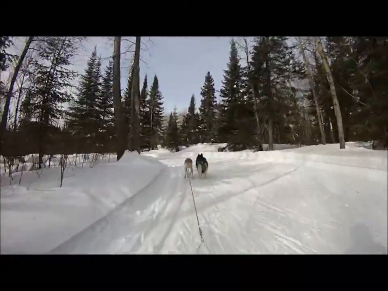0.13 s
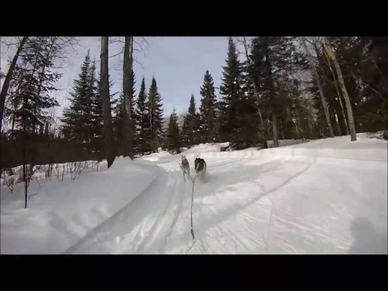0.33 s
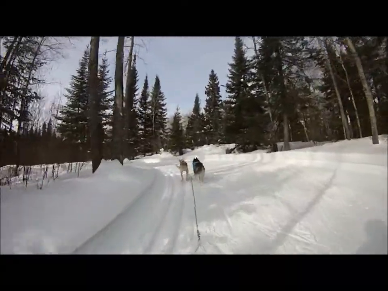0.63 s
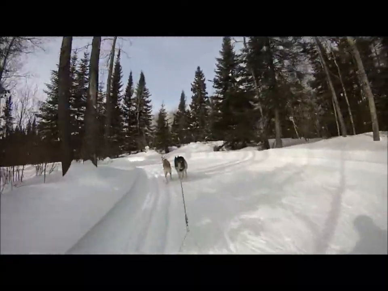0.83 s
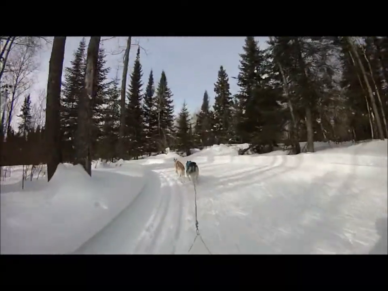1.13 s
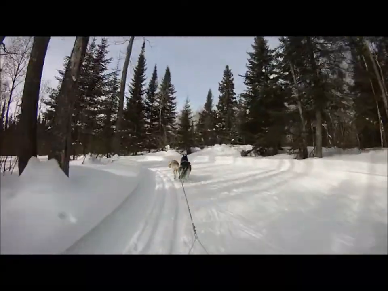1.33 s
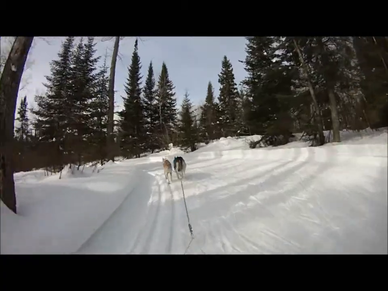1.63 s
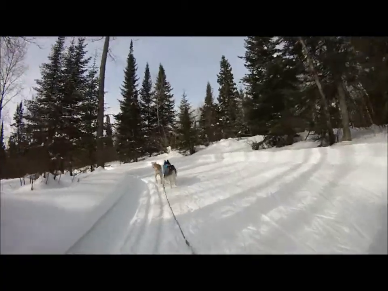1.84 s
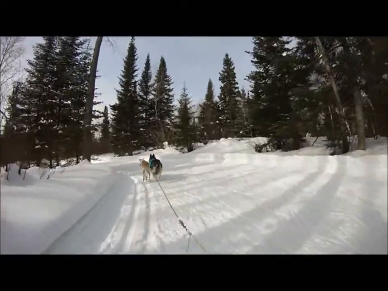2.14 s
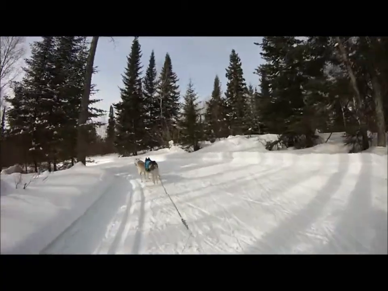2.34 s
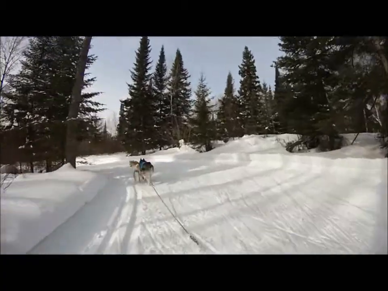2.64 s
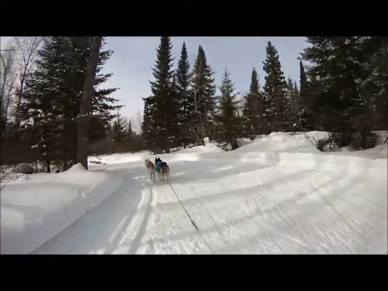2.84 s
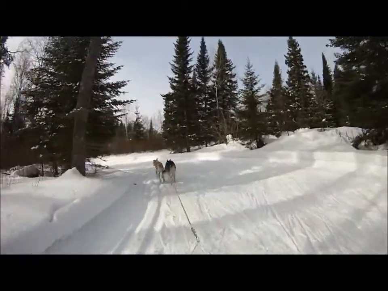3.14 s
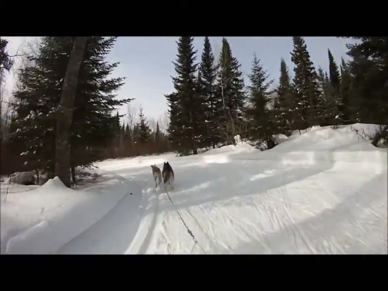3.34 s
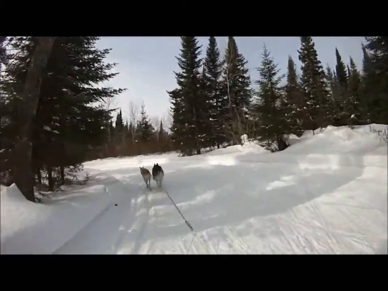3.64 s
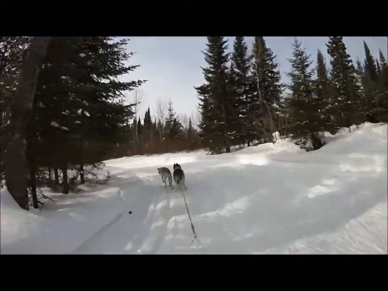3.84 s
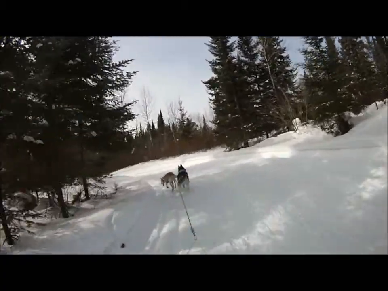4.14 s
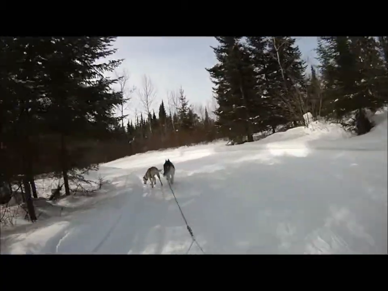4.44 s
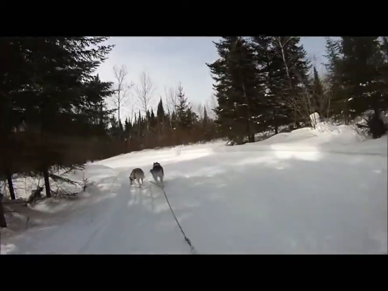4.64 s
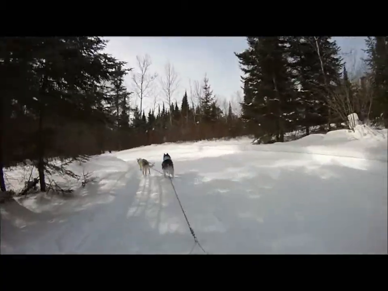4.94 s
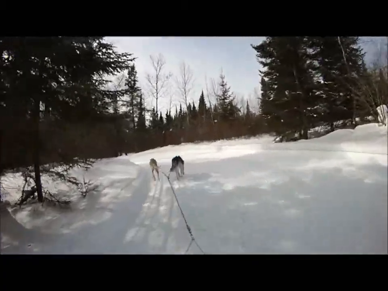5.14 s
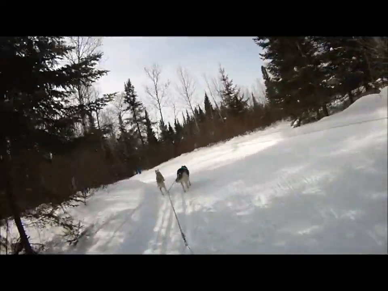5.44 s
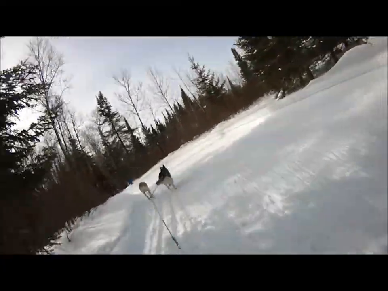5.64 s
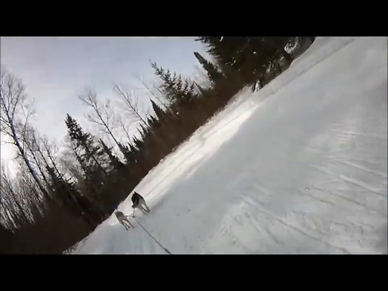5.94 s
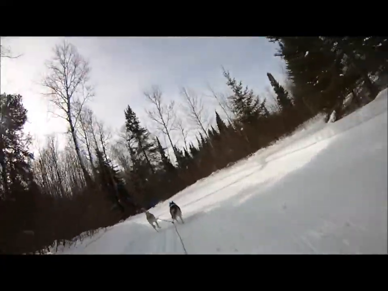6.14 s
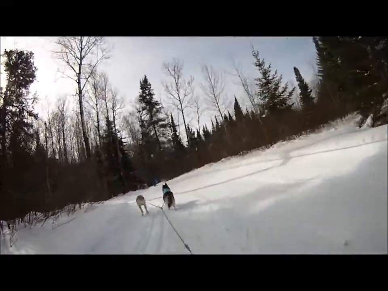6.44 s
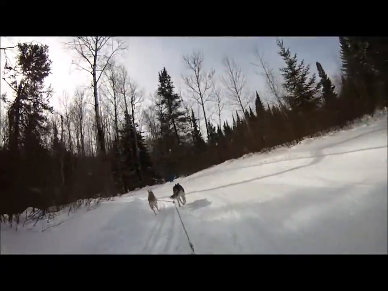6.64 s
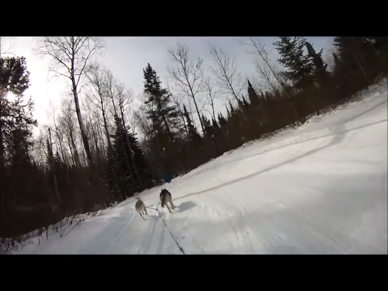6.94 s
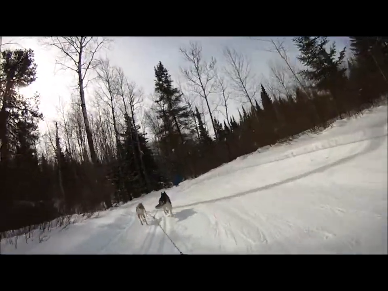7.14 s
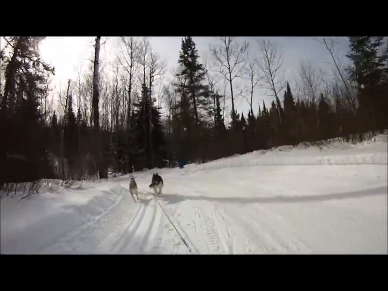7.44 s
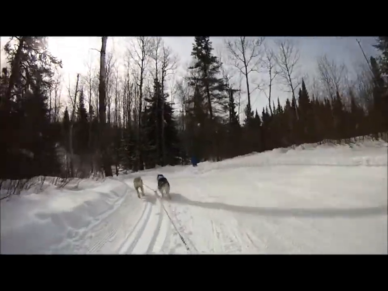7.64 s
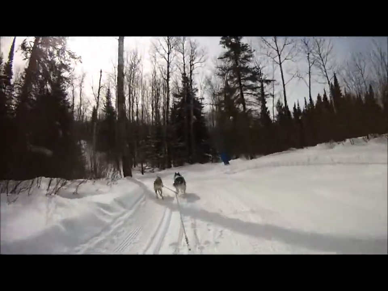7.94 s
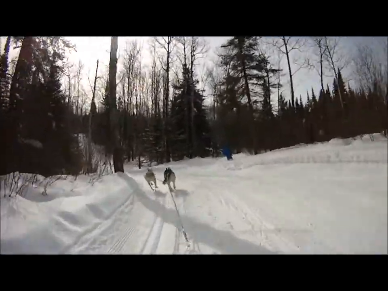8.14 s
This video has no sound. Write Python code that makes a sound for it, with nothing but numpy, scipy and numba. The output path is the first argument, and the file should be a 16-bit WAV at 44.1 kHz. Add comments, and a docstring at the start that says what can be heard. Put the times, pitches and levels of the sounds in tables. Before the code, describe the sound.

Outdoors on a snowy forest trail, a dog sled's runners scrape with a flickering, grainy hiss. The quiet opening gives way to clusters of plastic ticks, low thumps and wind buffets around one and a half seconds. Sharper clicks follow at three, then the hardest knocks near five. After a quieter, ticking stretch, bumps return at the end. The close onboard microphone sounds boxed-in and mono, ducking after loud hits.

```python
"""Sled runners hiss along a packed forest trail: grainy noise rung through a plastic housing's modes.
The mount ticks, creaks and rattles by stick and slip: each slip strikes the same modes and adds a snap.
Wind buffets the microphone as gusty bands of low noise; jolts thump it as brief low swings.
Gain control ducks the loud bursts and creeps back; one microphone feeds both channels."""
import sys
import numpy as np
from scipy import signal
from scipy.io import wavfile
from scipy.ndimage import uniform_filter1d
from numba import njit

SR = 44100
rng = np.random.default_rng(int(sys.argv[2]) if len(sys.argv) > 2 else 0)


def output_pcm(signal):
    """Save a mono or channel-first signal as 16-bit PCM at the path in sys.argv[1].

    Samples are clipped to [-1, 1] before scaling.
    """
    pcm = np.clip(np.atleast_2d(signal).T, -1, 1) * 32767
    wavfile.write(sys.argv[1], SR, np.round(pcm).astype(np.int16))


def volts_from_db(level):
    """Convert decibel levels to linear amplitude ratios."""
    exponent = np.asarray(level, float) / 20
    return 10 ** exponent


N = 365126

# All levels are those of the layers, ahead of the gain control.
# runner hiss through the glide: t/s, level/dB
HISS_LEVEL = [(0.0, -36), (0.12, -46.5), (0.46, -49.5), (1.47, -39.5), (1.68, -46.5), (2.17, -31),
              (2.33, -39.5), (2.85, -30.5), (3.23, -42), (4.17, -39.5), (4.56, -41), (4.98, -30),
              (5.5, -44), (6.0, -37.5), (6.2, -49), (7.2, -45), (7.55, -31), (7.8, -41), (8.28, -34.5)]
# wind and shaking on the microphone: t/s, level/dB
GUST_LEVEL = [(0.0, -51.5), (0.23, -34.5), (0.32, -52), (0.8, -47.5), (1.45, -41), (1.63, -27.5),
              (1.87, -42), (2.2, -43), (2.44, -29.5), (2.72, -48), (2.97, -29), (3.14, -40.5),
              (3.33, -25.5), (3.42, -41), (3.83, -44), (3.94, -29), (4.33, -29.5), (4.4, -43), (4.66, -34),
              (4.89, -39.5), (5.14, -30), (5.23, -43.5), (5.4, -34), (5.78, -46), (6.1, -34), (6.2, -51.5),
              (7.4, -40), (7.63, -30), (7.82, -32.5), (7.89, -46), (7.95, -35.5), (8.28, -34.5)]
# resonant modes of the housing: f/Hz, width/Hz, level/dB
HOUSING_MODES = [(735, 790, -12.5), (1046, 372, -3), (1449, 180, -6.5), (1604, 51, -3), (2037, 167.5, 1),
                 (2284, 239, -2.5), (3184, 250, -17.5), (3638, 220, -15), (4627, 240, -6.5),
                 (5172, 230, -9), (6256, 390, -22.5), (7040, 260, -15.5), (8210, 287, -17),
                 (9810, 116, -37.5), (10530, 430, -50), (12700, 460, -46), (13600, 740, -50)]
# broad resonances of a slip's snap: f/Hz, width/Hz, level/dB
SNAP_BANDS = [(1560, 530, -16), (6860, 3100, -12)]
# eddy sizes in the wind, as bands of rumble: f/Hz, level/dB
EDDY_BANDS = [(65, -16.5), (120, -9.5), (200, -0.5), (310, 2.5), (460, -8.5), (700, -38)]
# single slips of the mount: t/s, relative level/dB, then against it: body/dB, treble/dB
TICK_SLIPS = [(0.1213, -15.5, -10, 1.5), (0.4705, -18, -11, -14), (0.7405, -19, -10, 1.5),
              (0.8186, -13.5, -10, -7), (0.8383, -15.5, -11, -7), (0.8766, -13, -11, -11),
              (0.936, -22, -11, -30), (1.3474, -20, -1.5, -6.5), (1.5871, -13, -7, -5),
              (1.642, -9.5, -10, -8.5), (1.6513, -11, -7.5, -10), (1.6224, -22, -4, -9),
              (1.6941, -9.5, -14, -8.5), (1.7005, -22, -11, -14), (1.9017, -14.5, -9.5, -29),
              (1.915, -18.5, -4.5, -28), (1.931, -17.5, -5, -21), (2.4069, -8, -15, -19.5),
              (2.8397, -9.5, 0, -15), (2.8987, -12, -9, -20), (2.9798, -11, -13, -24),
              (3.0027, -1.5, -6, -7.5), (3.1868, -18.5, 4, -8), (3.2141, -1, -4, -15),
              (3.2213, -8, -14, -12), (3.2309, -20, -11, -3), (3.2429, -9, -7, -12), (3.25, -10, -8, -15),
              (3.2579, -11, -18, -9), (3.2753, -12.5, -5.5, -7.5), (3.3692, -19, -2.5, -18),
              (3.3999, -13.5, -6, -20), (3.583, -25, 1, -3), (3.5957, -20.5, -4.5, -21),
              (3.6731, -8, -6, -2.5), (4.3025, -21.5, -6, -12), (4.567, -21.5, 6, -34),
              (4.7977, -1.5, -14.5, -41), (4.8567, 7.5, -16.5, -18), (5.1565, 0, -8, -11.5),
              (5.3806, -13, -5, -15), (5.3898, -4.5, -6, -22), (5.4996, -6.5, -12.5, -10),
              (5.6009, -0.5, -7.5, -6), (5.8108, -15.5, -5.5, -5.5), (5.9821, -14, -7, -9),
              (6.0471, -5.5, -4.5, -9.5), (6.2143, -22, -1.5, -18), (6.3768, -23.5, -14, -12),
              (6.4806, -20.5, -14, -10.5), (6.7445, -17.5, -6, -6), (6.79, -16, -5, -4),
              (7.0203, -17, -8.5, -36), (7.503, -4, -21, -27), (7.6366, -3, -12, -7),
              (7.6637, -9.5, -7.5, -3), (7.706, -10, -16, -15), (7.7883, -16.5, -6, -5),
              (7.805, -5.5, -12, -6), (8.205, -11, -7, -23), (8.2633, -13, -8, -12)]
# creaks, slips too quick to count:
# start t/s, length/s, relative first level/dB, last level/dB, treble/dB, mean pace/(slips per s)
CREAK_TRAINS = [(0.175, .022, -25.5, -27, -15, 306), (0.199, .022, -26, -30, -7, 420),
                (0.232, .01, -29, -30, -14, 276), (0.243, 0.035, -19, -22, -3.5, 210),
                (0.475, 0.034, -30.5, -33, -3, 270), (0.743, 0.07, -31, -28, 0.5, 307),
                (0.982, 0.025, -25, -31, -3, 314), (1.175, .018, -26, -32, -5, 203),
                (1.368, .034, -27, -19, -10, 237), (1.403, .02, -29, -26, -6, 280),
                (1.788, .028, -22, -32, -3, 293), (1.82, .03, -28.5, -25, -1.5, 310),
                (3.007, 0.047, -19, -29.5, -8, 215), (3.675, 0.039, -21.5, -30, -4.5, 270),
                (4.052, 0.035, -24, -23, -4.5, 214), (4.567, 0.013, -40, -38, -3, 250),
                (5.007, 0.0155, -15.5, -43, -14, 250), (5.394, 0.035, -14.5, -23, -6.5, 225),
                (6.05, .046, -9, -21, -6, 295), (6.603, 0.029, -39.5, -25.5, -8.5, 213),
                (6.751, .034, -22.5, -25.5, -1, 264), (7.279, 0.011, -22.5, -30.5, -9, 147)]
# rattles, slips slow enough to count: same columns as the creaks
RATTLE_TRAINS = [(1.852, 0.02, -23.5, -28, -2.5, 127), (2.254, 0.047, -24.5, -13.5, -10, 115),
                 (2.536, 0.025, -18.5, -18, -11.5, 145), (4.3227, 0.06, -15, -22, -7.5, 100),
                 (5.4289, 0.019, -22, -21.5, -2.5, 112), (5.537, .036, -18, -17.5, -1, 62),
                 (5.6513, 0.036, -13.5, -16, -2.5, 70), (5.6914, .042, -16.5, -16, -4.5, 82),
                 (8.2202, 0.021, -11, -20.5, -12, 107)]
# the hardest jolts: t/s, envelope peak level/dB
JOLTS = [(1.1785, -17.5), (1.3534, -18.5), (1.4192, -16), (1.4724, -19), (1.5508, -16), (1.5819, -17.5),
         (1.618, -16), (1.672, -17), (1.7082, -16), (1.907, -22.5), (2.4457, -19), (2.96, -35),
         (3.9381, -16), (4.342, -11), (4.463, -18), (4.634, -19.5), (4.9146, -18), (5.0703, -15),
         (5.1449, -7.5), (5.1854, -14), (5.3585, -17.5), (7.5308, -13), (7.628, -11.5), (7.8164, -14),
         (8.0045, -21.5), (8.23, -14)]

# faint slips all along: relative levels start at the floor and rise above it at random
FAINT_PER_S, FAINT_FLOOR_DB, FAINT_MEAN_RISE_DB, FAINT_TREBLE_DB = 9, -35, 4, -13
TICK_TOP_UNDER_TREBLE_DB = 2
CREAK_SLOWING = 0.25  # drop in pace from start to end, as a share of the mean pace
THUMP_HZ, THUMP_SCATTER = 324, 0.12  # scatter: largest share up or down


def curve(rows):
    """Automation lanes: a table's columns joined by straight lines in time."""
    s, *columns = np.transpose(rows)
    return [np.interp(np.arange(N) / SR, s, c) for c in columns]


def unit(x):
    """Scale to rms 1."""
    return x / np.sqrt(np.mean(x ** 2))


def ring(x, hz, width):
    """One damped mode as a two-pole resonator, gain about 1 at its centre; wider dies sooner."""
    r = np.exp(-np.pi * width / SR)
    edge = (1 - r * r) / 2
    return signal.lfilter([edge, 0, -edge], [1, -2 * r * np.cos(2 * np.pi * hz / SR), r * r], x)


def walk(rate):
    """Random levels held 1 / rate s and slewed twice; spread 1."""
    hold = int(SR / rate)
    w = np.repeat(rng.standard_normal(N // hold + 1), hold)
    w = uniform_filter1d(uniform_filter1d(w, hold), hold)[:N]
    return w / w.std()


def grains(per_s, spread_db):
    """Scattered impulses of either sign, many small and a few large; rms 1."""
    hit = rng.random(N) < per_s / SR
    sign = np.sign(rng.standard_normal(N))
    size = np.minimum(rng.exponential(size=N), 3.5)
    return unit(hit * sign * volts_from_db(spread_db * size))


def runner_hiss(db):
    """Runners scrape packed snow: flickering noise and grains, heard through the housing's modes."""
    scrape = unit(rng.standard_normal(N) + 0.6 * grains(900, 3.5))
    snow = scrape * volts_from_db(1.2 * walk(25) + 2.2 * walk(90))
    hiss = 0
    for k, (hz, width, mode_db) in enumerate(HOUSING_MODES):
        # each mode also wavers on its own; neighbours have opposite polarity
        hiss = hiss + (-1) ** k * volts_from_db(mode_db) * ring(snow * volts_from_db(0.6 * walk(12)), hz, width)
    return unit(hiss) * volts_from_db(db)


def buffeting(db):
    """Eddies of every size swing the membrane in flurries; strong gusts carry more small, quick eddies."""
    flurry, out = walk(14), 0
    knocks = grains(45, 3.95) * volts_from_db(4.0 * flurry)  # some eddies hit at every size at once
    for hz, size_db in EDDY_BANDS:
        eddies = grains(0.7 * hz, 4.36) * volts_from_db(2.7 * flurry + 2.3 * walk(18))
        # the big slow eddies overlap into a smoother rumble
        rumble = 120 / hz * rng.standard_normal(N)
        push = 0.87 * knocks + eddies + rumble
        swing = unit(ring(ring(push, hz, 0.92 * hz), hz, 0.92 * hz))
        gust_tilt_db = 0.022 * (db + 41.0) * np.log2(hz / 280)
        out = out + swing * volts_from_db(size_db + gust_tilt_db)
    return unit(out) * volts_from_db(db)


def tick_slips():
    """Single slips, listed and faint at random: rows (t/s, level/dB, body/dB, treble/dB, top/dB)."""
    when, chance = rng.random((int(FAINT_PER_S * N / SR), 2)).T
    level = FAINT_FLOOR_DB - FAINT_MEAN_RISE_DB * np.log(1 - chance)
    faint = [(w * N / SR, db, -8, FAINT_TREBLE_DB) for w, db in zip(when, level)]
    return [(s, db, body, treble, treble - TICK_TOP_UNDER_TREBLE_DB)
            for s, db, body, treble in TICK_SLIPS + faint]


def train_slips(trains, slowing, jitter, size_db, shine_db):
    """Stick and slip in uneven runs: rows (t/s, level/dB, body/dB, treble/dB, top/dB)."""
    rows = []
    for start, length, first_db, last_db, treble, mean_pace in trains:
        t = 0
        for gap, size, shine in rng.standard_normal((64, 3)):  # at most 64 slips a train
            if t > length:
                break
            pace = mean_pace * (1 + slowing * (0.5 - t / length))
            glide_db = first_db + (last_db - first_db) * t / length
            # slower trains put the same power in fewer slips
            db = glide_db + 9 - 10 * np.log10(pace / 200) + size_db * size
            bright = treble + shine_db * shine
            rows.append((start + t, db, -9, bright - 4.1, bright - 6.1))
            t += np.exp(jitter * gap) / pace
    return rows


def slip_forces(rows, scatter_db, judder):
    """Force on every mode, a sharp release then a fading judder; also the snap, too short to ring."""
    s, db, body, treble, top = np.transpose(rows)
    at = np.minimum(s * SR, N - 1).astype(int)
    # each slip grips the modes a little differently
    grip_db = scatter_db * rng.standard_normal((len(rows), len(HOUSING_MODES)))
    # a dull slip lets go less cleanly and judders more
    rough = judder * volts_from_db(np.clip(-0.4 * (top + 10), -3, 9))
    shake = rng.standard_normal(N)
    forces = []
    for k, (hz, _, _) in enumerate(HOUSING_MODES):
        if hz < 1500:
            part_db = body + 9
        elif hz < 2800:
            part_db = 0
        elif hz < 5600:
            part_db = treble + 9.5
        else:
            part_db = top + 13
        size = volts_from_db(db + part_db + grip_db[:, k])
        # the judder is stronger but dies sooner in the high modes: 4.5 ms at 2 kHz
        height = (hz / 2000) ** 0.7
        fade = np.exp(-height / 0.0045 / SR)
        tail = signal.lfilter([1], [1, -fade], np.bincount(at, size * rough, N))
        forces.append(height * shake * tail - np.bincount(at, size, N))
    release = np.bincount(at, volts_from_db(db + top), N)
    snap = 0
    for hz, width, snap_db in SNAP_BANDS:
        snap = snap + volts_from_db(snap_db) * ring(ring(release, hz, width), hz, width)
    return forces, snap


def mount():
    """Ticks, creaks and rattles of the mount strike the housing's modes; their snaps bypass them."""
    rattles = train_slips(RATTLE_TRAINS, 0, 0.05, 0.8, 1.5)
    creaks = train_slips(CREAK_TRAINS, CREAK_SLOWING, 0.06, 1.4, 1.5)
    tick_force, tick_snap = slip_forces(tick_slips() + rattles, 0.8, 0.048)
    creak_force, creak_snap = slip_forces(creaks, 1.5, 0.055)
    struck = tick_snap + creak_snap
    for k, (hz, width, db) in enumerate(HOUSING_MODES):
        force = volts_from_db(26.5) * (tick_force[k] + creak_force[k])
        struck = struck + (-1) ** k * volts_from_db(db) * ring(force, hz, width)
    return struck


def thumps():
    """A jolt throws the membrane out and back in a swing or two, either way first."""
    out = np.zeros(N)
    for (s, db), (turn, tune) in zip(JOLTS, rng.random((len(JOLTS), 2))):
        hz = THUMP_HZ * (1 + THUMP_SCATTER * (2 * tune - 1))
        cycles = np.arange(-2, 2, hz / SR)
        swing = volts_from_db(db) * np.sin(2 * np.pi * (cycles + turn)) * np.exp(-(cycles / 0.46) ** 2)
        at = int(s * SR) - len(cycles) // 2
        out[at:at + len(swing)] += swing
    return out


def scene():
    """One microphone hears runners, wind, mount and jolts, and feeds both channels."""
    mono = runner_hiss(*curve(HISS_LEVEL)) + buffeting(*curve(GUST_LEVEL)) + mount() + thumps()
    return np.tile(mono, (2, 1))


@njit
def duck(x, top, power, attack, release):
    """Gain falls fast when the sound passes the level top and creeps back; rates are per sample."""
    y, envelope = np.empty(len(x)), top
    for i in range(len(x)):
        peak = max(abs(x[i]), top)
        envelope += (peak - envelope) * (attack if peak > envelope else release)
        y[i] = x[i] * (top / envelope) ** power
    return y


def roll_off(x):
    """The treble ends steeply here."""
    return signal.sosfilt(signal.butter(12, 16470, fs=SR, output="sos"), x)


def record(dry):
    """Gain control, 2.5 dB of make-up into a hard ceiling, then a steep cut of the top."""
    ducked = duck(dry[0], top=0.081, power=0.68, attack=0.0025, release=0.00019)
    held = np.clip(ducked * volts_from_db(2.5), -1, 1)
    low_pass = signal.butter(N=8, Wn=14500.0, fs=SR, output="sos")
    dull = signal.sosfilt(low_pass, held)
    return roll_off(np.array([dull, dull]))


dry = scene()
out = record(dry)
output_pcm(out)
```